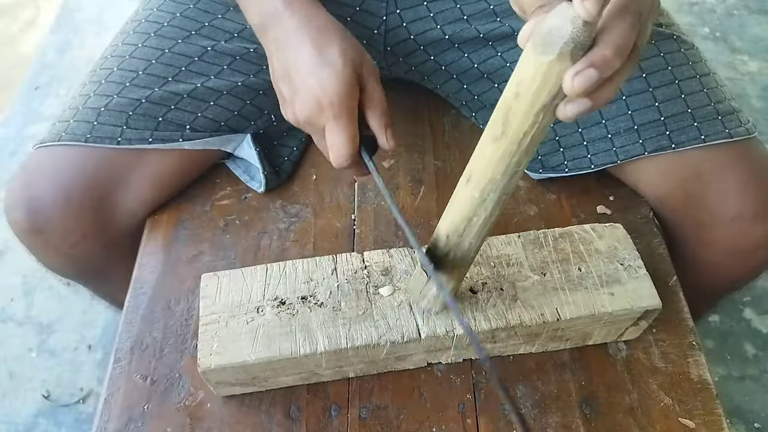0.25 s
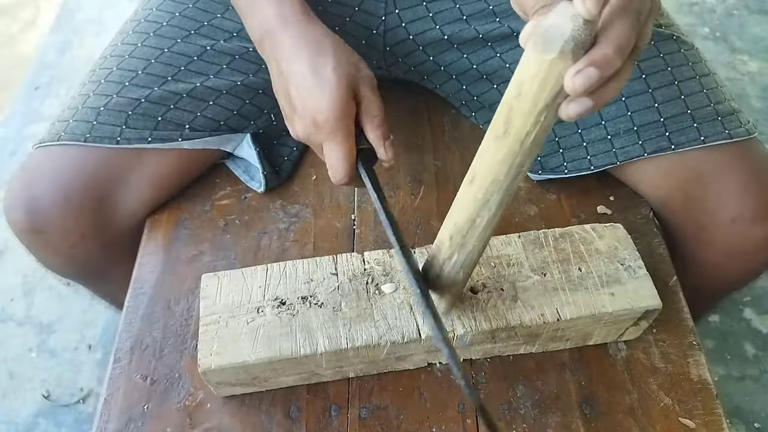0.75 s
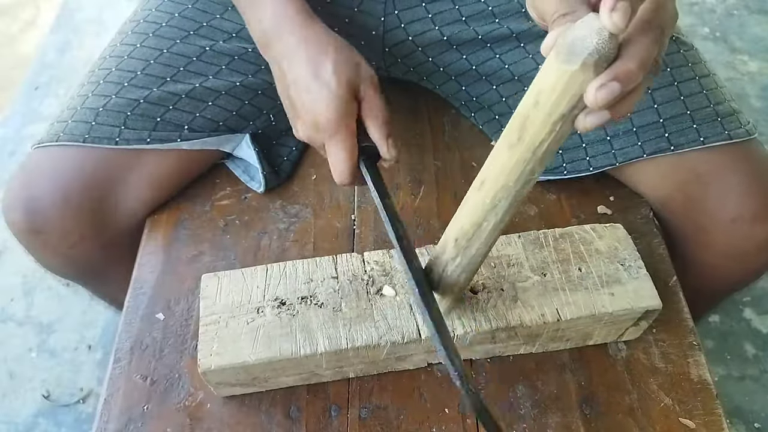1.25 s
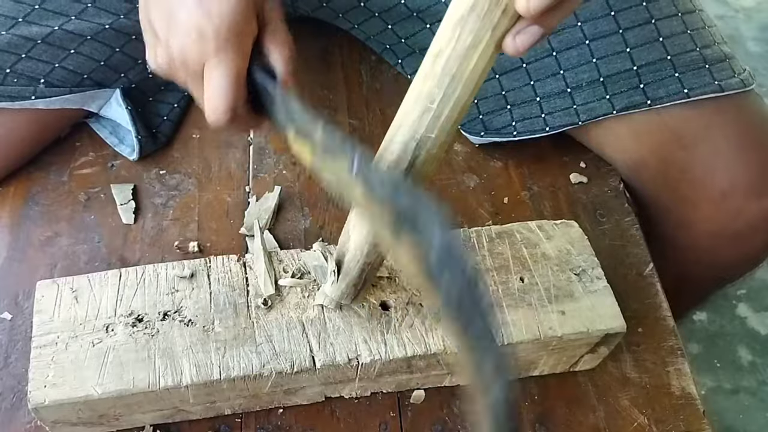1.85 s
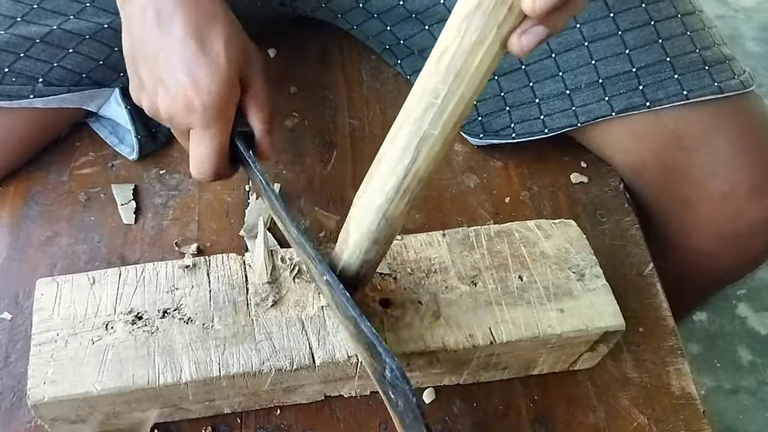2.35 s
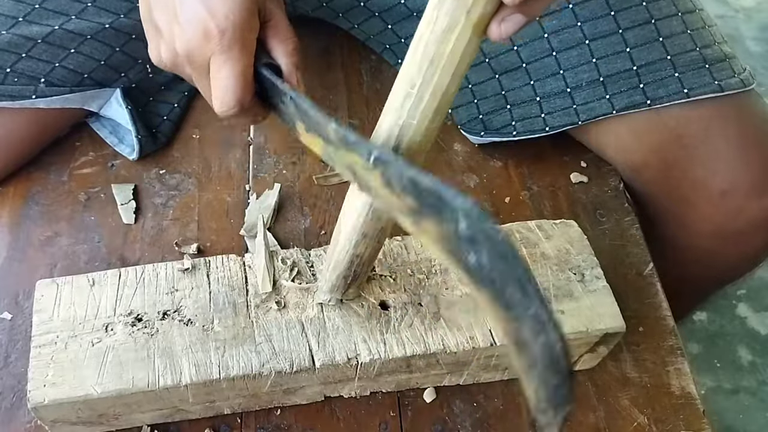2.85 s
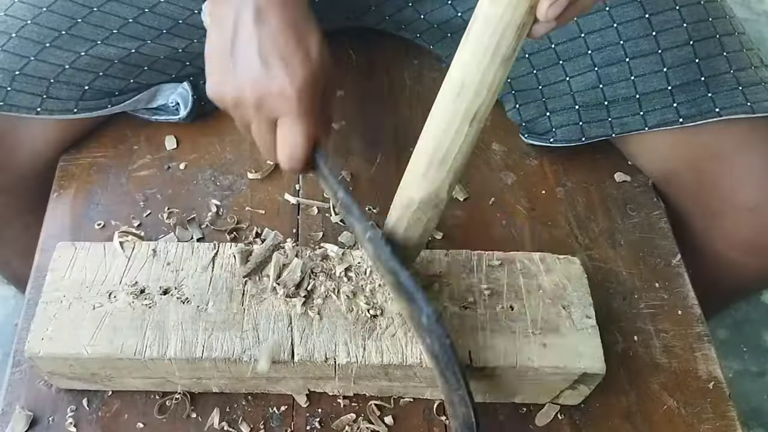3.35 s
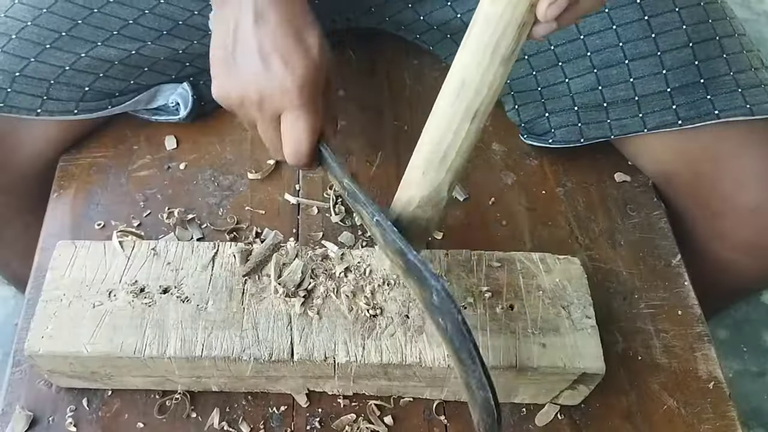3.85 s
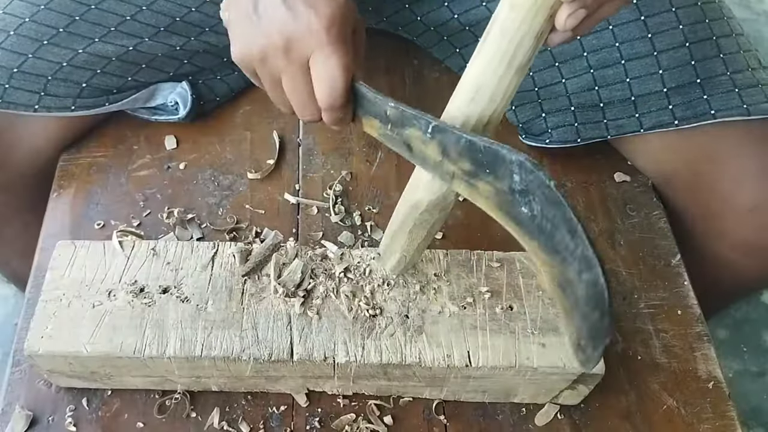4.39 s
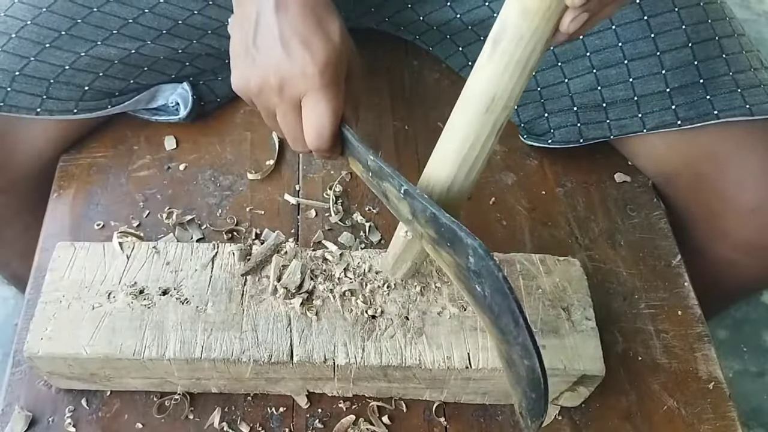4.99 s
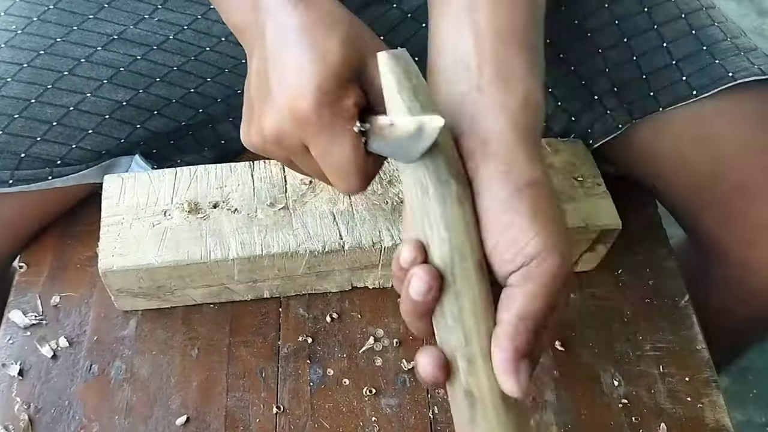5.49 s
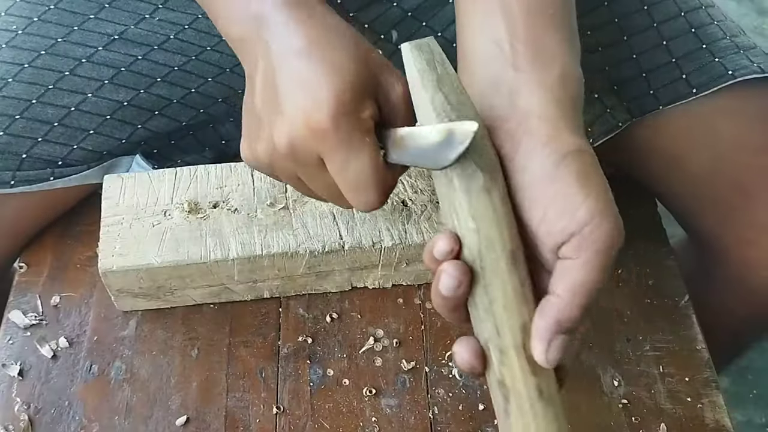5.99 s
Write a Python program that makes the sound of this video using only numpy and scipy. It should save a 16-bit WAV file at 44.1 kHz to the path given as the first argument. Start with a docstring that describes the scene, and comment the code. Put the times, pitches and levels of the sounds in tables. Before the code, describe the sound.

A curved blade chops a wooden stick on a block with hard, hollow knocks, then scratchy shaving strokes, while chicks peep faintly in the distance.

```python
"""Outdoors at a bench, a phone held close above: a curved blade works the end of a bamboo stick on a block.
From the start it chops: blows ring modes of bench and block, noise bursts crack through blade and stick.
Light strokes hiss between the blows; from about 3.4 s shaving takes over, gritty noise under edge pressure.
Far chicks peep throughout as blurred glides; the background, banded noise, changes abruptly at 3.1 and 5.5 s.
From 5.5 s a distant motor hums, noise in narrow resonances. A diffuse porch echo follows the work."""
import sys
import numpy as np
from scipy import signal
from scipy.fft import rfft, irfft, next_fast_len
from scipy.io import wavfile
from scipy.ndimage import uniform_filter1d

SR = 44100
rng = np.random.default_rng(int(sys.argv[2]) if len(sys.argv) > 2 else 0)


def put_to_file(sound):
    """Save the sound as 16-bit audio at rate SR, in the file named by the first command-line argument."""
    columns = np.atleast_2d(sound).T  # one column per channel
    safe = np.clip(columns, -1, 1)
    whole_steps = np.round(safe * 32767)
    wavfile.write(sys.argv[1], SR, whole_steps.astype(np.int16))


N = 274743
TIME = np.arange(N) / SR
FFT_SIZE = next_fast_len(N, True)
FREQ = np.fft.rfftfreq(FFT_SIZE, 1 / SR)


def undb(db):
    """Decibels to gain."""
    return np.exp(np.asarray(db) * np.log(10) / 20)


def level(x, db):
    """Scale to an rms level."""
    return x * undb(db) / np.sqrt(np.mean(x ** 2))


def add(out, start_s, x):
    """Mix x into out from a start time."""
    i = max(int(start_s * SR), 0)
    out[..., i:i + x.shape[-1]] += x[..., :N - i]


def resonate(x, peaks):
    """Sum of two-pole resonances (pitch_hz, width_hz, level_db) with alternating sign."""
    total = 0
    for k, (hz, width_hz, db) in enumerate(peaks):
        b, a = signal.iirpeak(hz, hz / width_hz, SR)
        total = total + (-1) ** k * undb(db) * signal.lfilter(b, a, x)
    return total


def smooth(x, k):
    """Two moving averages of k samples."""
    return uniform_filter1d(uniform_filter1d(x, k), k)


def walk(rate_hz):
    """Smooth random drift with spread near 1, one new value per period."""
    k = int(SR / rate_hz)
    steps = np.repeat(rng.standard_normal(N // k + 1), k)
    return np.sqrt(2) * smooth(steps, k)[:N]


def pair(likeness):
    """Left and right noise that are partly the same."""
    mid, side = rng.standard_normal((2, N))
    c = np.clip(likeness, 0, 1)
    return (np.sqrt(1 + c) * mid + np.sqrt(1 - c) * side * np.array([[1], [-1]])) / np.sqrt(2)


def octave_band(octave, centre_hz):
    """Gain of one octave band that overlaps its neighbours at constant power."""
    return np.clip(1 - np.abs(octave - np.log2(centre_hz)), 0, 1) ** .5


def colour(points):
    """Gain at every frequency from points (pitch_hz, level_db)."""
    hz, db = np.transpose(points)
    return undb(np.interp(np.log(np.maximum(FREQ, 1)), np.log(hz), db))


def shape(x, gain):
    """Filter by a gain at every frequency."""
    return irfft(rfft(x, FFT_SIZE) * gain, FFT_SIZE)[..., :N]


def push(contact_ms):
    """Half-sine force of unit area."""
    force = np.sin(np.pi * np.minimum(TIME[:SR // 100] * 1000 / max(contact_ms, .1), 1))
    return force / force.sum()


# modes of bench (below 400 Hz) and block (above), before detuning and damping:
# pitch_hz [Hz], level_db [dB], t60_s [s]
WOOD_MODES = [(200, -22, 0.31), (211, 6, 0.13), (240, 7.5, 0.13), (266.4, 4, 0.11), (290.4, 2.5, 0.11),
              (369.5, -0.5, 0.45), (437, -9.5, 0.12), (541, -13.5, 0.13), (601.4, -9.5, 0.082),
              (790, -31.5, 0.015), (738, -18, 0.034), (861, -18, 0.023), (1017, -9, .035),
              (1090, -25.5, 0.034), (1520, -18.5, 0.0075), (1700, -15.5, 0.026)]
FAVOUR_DB = 143  # loss of a bench mode one octave from the favoured pitch


def ring(favoured_hz, hard_db, damping, detune):
    """Answer to one unit tap: the slow bench modes and the quick block modes, as decaying sines."""
    hz, db, t60_s = np.transpose(WOOD_MODES)
    bench = hz < 400
    db = np.where(bench, db - FAVOUR_DB * np.log2(hz / favoured_hz) ** 2, db + hard_db)
    t = TIME[:SR // 3, None]
    decay = undb(db - 60 * t * damping / t60_s)
    modes = decay * np.sin(2 * np.pi * hz * (1 + 0.023 * detune) * t)
    return modes[:, bench].sum(axis=1), modes[:, ~bench].sum(axis=1)


# force of each blow on the block, before the bass cut: start_s [s], peak_db [dB],
# pitch_hz the bench favours [Hz], contact_ms [ms], hard_db level added to the block modes [dB],
# damping [factor on the decay rate]
BLOWS = [(0.066, 6.5, 280, 0.9, -11, 0.92), (.31, -36.5, 235, 2.9, -1, 0.85),
         (0.5967, 4.5, 272, 0.62, -9.5, 1.16), (0.6031, -2, 212, 0.81, 2.5, 0.86),
         (0.733, -14.5, 285, 1.5, -11, 1.24), (1.1308, 5.5, 276, 1.96, -30, 1.03),
         (1.213, -23, 220, 1.16, -16, 1.3), (1.368, -40, 245, 2.1, -7, 1.3),
         (1.5516, -4.5, 244, 3.1, -4.5, 0.84), (1.5613, 3.5, 263, 2.03, -1.5, 2.15),
         (1.742, -33, 234, 2.5, -10, .8), (1.955, -3, 254, 0.62, -7, 2), (1.9607, 2.5, 282, 1.06, 3, 1.5),
         (2.137, -42, 181, 1, -2, 0.86), (2.3704, 0.5, 240, 1.1, -18, 6.8),
         (2.379, 2.5, 252, 1.15, 9, 1.33), (2.806, -26.5, 240, 2.7, -12.5, 0.69),
         (2.85, -36.5, 246, 1.7, -18, 0.92), (3.0876, -3, 221, 1.44, -0.5, 0.92),
         (3.097, -9, 298.4, 0.32, 4.5, 1), (3.268, -26, 258, 2.6, -24, 0.88),
         (3.4003, 1.5, 227, 1.26, 0, 1.27), (3.4228, -12, 212, 1.5, -2, 2.1),
         (3.467, -3, 218, 0.9, -18, 1.01), (3.569, -10.5, 240, 1.14, -16, 0.56),
         (3.809, -24.5, 240, 1.2, -19, 0.63), (3.841, -12, 240, 1.36, -18, 0.55),
         (3.865, -10.5, 232, 2.1, -12, 0.76), (4.133, -32, 238, 2.8, -19, 0.44),
         (4.5724, -10, 225, 1.1, -12, 0.48), (4.5867, 4, 215, 1.76, -8.5, 1.6),
         (4.774, -28.5, 240, 1.1, 1.5, 0.89), (4.973, -18.5, 234, 2.7, -9.5, 1.6),
         (5.006, -23.5, 222, 3.3, 0.5, 0.59), (5.345, -7, 230, 2.1, -2, 0.84)]


def blows():
    """Chopping blows: the bench feels the whole push, the block only its sharp start."""
    out = np.zeros(N)
    detune = rng.standard_normal((len(BLOWS), len(WOOD_MODES)))
    for (start_s, db, hz, contact_ms, hard_db, damping), d in zip(BLOWS, detune):
        bench, block = ring(hz, hard_db, damping, d)
        bench_thud = signal.fftconvolve(bench, push(contact_ms))
        block_thud = signal.fftconvolve(block, push(0.26 * contact_ms))
        thud = bench_thud - block_thud
        add(out, start_s, thud * undb(db) / np.max(np.abs(thud)))
    return out


# the blade reaches the block, before the bass cut: start_s [s], peak_db [dB],
# pitch_hz the block favours [Hz], t60_ms [ms]
KNOCKS = [(1.9608, -4.5, 800, 17), (2.3784, 7.5, 1447, 21), (4.5861, 3.5, 730, 15)]


def knocks():
    """Short hard knocks: block modes near the favoured pitch, damped by the blade that stays on the wood."""
    out, t = np.zeros(N), TIME[:SR // 8, None]
    hz = np.array([mode[0] for mode in WOOD_MODES if mode[0] > 400])
    for start_s, db, favoured_hz, t60_ms in KNOCKS:
        decay = undb(-70 * np.log2(hz / favoured_hz) ** 2 - 60000 * t / t60_ms)
        modes = decay * np.sin(2 * np.pi * hz * t)
        knock = -signal.fftconvolve(modes.sum(axis=1), push(0.84))
        add(out, start_s, knock * undb(db) / np.max(np.abs(knock)))
    return out


# resonances of blade and stick: pitch_hz [Hz], width_hz [Hz], level_db [dB]
BLADE_PEAKS = [(1806, 210, -17), (2830, 380, 0.2), (3300, 290, -2.5), (3900, 230, -3.5), (5074, 320, -4.2),
               (5770, 260, -38.5), (7500, 310, -36.5), (9670, 2430, -2.5)]
# fibres snapping and chips landing: start_s [s], level_db relative, set over the first 3 ms [dB],
# pan_db left minus right in the treble [dB], t60_ms of the main burst [ms],
# tilt_db brightness, held at -7 or above [dB per octave]
CRACKS = [(0.062, -10.5, 4, 32, -7), (0.31, -40.5, 21, 80, 0), (0.5936, -7, 7, 13, -7),
          (0.6004, -8, 2, 5.5, -5.5), (0.7304, -14.5, 7, 22, -3.5), (0.74, -17, -9, 20, 1.5),
          (1.1278, -10.5, 3, 35, -6.5), (1.202, -32, 7, 38, 6), (1.3686, -48.5, 3, 31, 4),
          (1.3898, -18, 10, 8.3, 14), (1.5506, -21, -6, 59, -2.5), (1.7427, -64, 15, 21, 0),
          (1.9526, -13.5, 2, 51, -16.5), (1.959, -22.5, 10, 22, 9.5), (2.367, -21.5, 0, 42, -6.5),
          (2.37, -11, 1, 26, -2.5), (2.3764, -13, -1, 13, -12.3), (2.4992, -34, 9, 9.6, 1),
          (2.5138, -41.5, 3, 69, -6), (2.617, -39.5, 6, 11, -12.5), (2.65, -51, 11.5, 75, -9),
          (3.084, -24.5, 5.5, 97, -2.2), (3.3776, -36, 6, 120, 4), (3.3962, -16, -0.5, 38, -1),
          (3.4647, -29, -2, 21, -8.5), (3.624, -36.5, 16, 54, -9), (3.9614, -46, -3, 25, 34),
          (4.07, -36, 13, 27, 12), (4.4366, -43.5, 11, 40, -3), (4.5667, -25.5, 9, 51, -2.5),
          (4.585, -31, -3, 26, -23), (4.6847, -45.5, 4, 27, -2), (4.972, -38.5, 8, 69, 0.5),
          (5.343, -29, 6, 51, -4), (5.626, -28, 3.5, 45, 0.5)]
SHADE_HZ = 4000  # the phone body shades one port above this


def cracks():
    """Bursts of snapping fibres that ring blade and stick, with a weaker splintering tail."""
    out, size = np.zeros((2, N)), SR // 5
    noise = rng.standard_normal((len(CRACKS), 2, size))
    t, f = TIME[:size], np.fft.rfftfreq(size, 1 / SR)
    shade = f ** 2 / (f ** 2 + SHADE_HZ ** 2) * np.array([[1], [-1]])  # left, right
    octaves = np.log2(np.maximum(f, 800) / 5000)
    for (start_s, db, pan_db, t60_ms, tilt_db), (same, unlike) in zip(CRACKS, noise):
        # even the dullest snap keeps some treble
        colour_db = max(tilt_db, -7) * octaves + shade * pan_db / 2
        spectrum = rfft(same) + 1.18 * shade * rfft(unlike)
        snap = irfft(spectrum * undb(colour_db), size)
        splintering = undb(-33.5 - 60 * t / 0.13)
        snap *= np.minimum(t / 0.0015, 1) * (undb(-60000 * t / t60_ms) + splintering)
        burst = resonate(snap, BLADE_PEAKS) + 0.21 * snap
        onset_rms = np.sqrt(np.mean(burst[:, :SR // 300] ** 2))
        add(out, start_s, burst * undb(db - 4.5) / onset_rms)
    return out


STEP = 32  # samples between pressure values
BITE_DB_PER_S, LIFT_DB_PER_S = 440.5, 518


def stroke(start_s, hold_s):
    """Pressure of one stroke as a gain: the edge bites in, holds and lifts off."""
    t = TIME[::STEP]
    bite_db = BITE_DB_PER_S * (t - start_s)
    lift_db = LIFT_DB_PER_S * (start_s + hold_s - t)
    return undb(np.minimum(0, np.minimum(bite_db, lift_db)))


RATTLE_DB, RATTLE_T60_S = -23, 0.23  # the block shakes on; dB relative to the blow
SPLINTER_DB, SPLINTER_T60_S = -56, 0.28  # hiss, likewise


def aftershake():
    """What goes on after every blow: splintering hiss and block rattle, as decaying gains."""
    out, t = np.zeros((2, N)), TIME[:SR // 3]
    for start_s, db, *_ in BLOWS:
        splinter_db = db + SPLINTER_DB - 60 * t / SPLINTER_T60_S
        rattle_db = db + RATTLE_DB - 60 * t / RATTLE_T60_S
        add(out, start_s, undb([splinter_db, rattle_db]))
    return out


# strokes of the edge along the fibres, down and back: start_s of full bite [s], hold_s [s],
# hiss_db gain on the tearing noise [dB], rumble_db gain on the slips that shake the bench [dB]
SHAVES = [(0.758, 0.0059, -38, -39), (0.829, 0.02, -54, -63), (1.19, 0.077, -59.5, -59),
          (1.4, 0.018, -61.5, -69), (1.742, 0.016, -55.5, -48), (2.151, 0.0088, -60, -69),
          (2.258, 0.011, -67, -61.5), (2.501, 0.056, -56, -39), (3.274, 0.028, -58.5, -60.5),
          (3.389, .02, -50, -51), (3.412, 0.04, -43.5, -22), (3.568, 0.016, -65, -33),
          (3.658, 0.082, -55.5, -64), (3.835, 0.052, -41, -30.5), (4.014, 0.074, -52.5, -45.5),
          (4.198, 0.04, -39, -22.5), (4.369, 0.034, -51, -44), (4.435, 0.012, -54.5, -50),
          (4.534, 0.039, -42.5, -22.5), (4.78, 0.038, -48, -51), (4.993, 0.037, -44.5, -45),
          (5.187, 0.036, -48, -55.5), (5.312, 0.049, -50.5, -45), (5.351, 0.027, -42.5, -29.5),
          (5.598, 0.028, -45.5, -61)]
# between strokes the edge rests on the stick: (start, end) in s, gains in dB
DRAG_S, DRAG_HISS_DB, DRAG_RUMBLE_DB = (3.4, 5.5), -62.5, -53


def pressure():
    """Gains of hiss and rumble, summed from strokes, drag and blows."""
    gains = stroke(DRAG_S[0], DRAG_S[1] - DRAG_S[0]) * undb([[DRAG_HISS_DB], [DRAG_RUMBLE_DB]])
    for start_s, hold_s, hiss_db, rumble_db in SHAVES:
        gains += stroke(start_s, hold_s) * undb([[hiss_db], [rumble_db]])
    return np.repeat(gains, STEP, axis=1)[:, :N] + aftershake()


def gritty(spread_db):
    """Dense clicks of very unequal size, at unit rms."""
    return level(rng.standard_normal(N) * undb(spread_db * rng.exponential(size=N)), 0)


# colour of tearing fibres: pitch_hz [Hz], level_db [dB per Hz, relative]
TEAR_COLOUR = [(530, -40), (900, -9), (1080, -7.5), (1270, -9.5), (1690, -4.5), (1960, -6.5), (2260, -1),
               (2930, -5), (3190, -3.5), (4100, -9), (5390, -9), (7010, -10.5), (9560, 0.5), (14500, -8),
               (15600, -8.5)]
GRIT_DB, SLIP_DB = 3.5, 2.8  # how unequal the clicks are
CATCH_DB, CATCH_PER_S = 3.5, 160  # the edge catches and lets go


def shaves():
    """Tearing fibres hiss while the slipping edge shakes the bench."""
    hiss_gain, rumble_gain = pressure()
    grit = gritty(GRIT_DB) * undb(CATCH_DB * walk(CATCH_PER_S))
    tear = grit * undb([[1.5], [-1.5]]) + 1.18 * pair(0)
    tear = tear + undb(6.5) * resonate(tear, BLADE_PEAKS)
    hiss = level(shape(tear, colour(TEAR_COLOUR)), 0.68) * hiss_gain
    # lower and upper hiss swell independently at random, so the colour keeps changing
    lower = signal.sosfilt(signal.butter(2, 6500, fs=SR, output="sos"), hiss)
    upper = hiss - lower
    hiss = lower * undb(4.1 * walk(25)) + upper * undb(2.0 * walk(25.05))
    slips = gritty(SLIP_DB) * rumble_gain
    tap = sum(ring(220.0, -28.5, 1.74, np.zeros(len(WOOD_MODES))))
    rumble = signal.fftconvolve(slips, tap / np.sqrt(np.sum(tap ** 2)))[:N]
    return hiss, rumble


# porch echo in octave bands: pitch_hz [Hz], t60_s [s], level_db relative [dB]
PORCH_BANDS = [(151, 0.22, -18.5), (334, 0.72, -31), (565, 0.23, -11), (1132, 0.15, -9.5),
               (2390, 0.11, -14.5), (4800, 0.063, -18), (9810, 0.07, -14.5)]


def porch(x):
    """Diffuse echo: noise that dies at its own rate in each octave."""
    size = SR * 2 // 3
    t, octave = TIME[:size], np.log2(np.maximum(np.fft.rfftfreq(size, 1 / SR), 1))
    tail = 0
    for hz, t60_s, db in PORCH_BANDS:
        noise = rng.standard_normal((2, size))
        noise[1] += (noise[0] - noise[1]) * min(100 / hz, .6)  # low bands are more alike left and right
        band = irfft(rfft(noise) * octave_band(octave, hz), size)
        envelope = np.minimum(t / 0.0007, 1) * undb(-60 * t / t60_s)
        tail = tail + band * envelope * undb(db + 3.5) / np.sqrt(np.sum(envelope ** 2))
    return signal.fftconvolve(x[None], tail, axes=1)[:, :N]


def sweep(start_s, end_s, hz0, hz1):
    """Progress from 0 to 1 and the phase of a straight pitch glide."""
    size = int((end_s - start_s) * SR)
    u = np.arange(size) / size
    return u, 2 * np.pi * np.cumsum(hz0 + (hz1 - hz0) * u) / SR


def glide(start_s, end_s, hz0, hz1, smear_hz):
    """A gliding partial, blurred by distance into a narrow band."""
    u, phase = sweep(start_s, end_s, hz0, hz1)
    k = int(SR / smear_hz)
    noise = rng.standard_normal((2, 2, len(u)))
    a, b = smooth(noise, k) * np.sqrt(3 * k / 2)
    return np.sin(np.pi * u) ** .5 * (a * np.cos(phase) + b * np.sin(phase))


# far chicks, before the flutter: start_s [s], end_s [s], start pitch_hz [Hz], end pitch_hz [Hz],
# level_db before the swell [dB rms], octave_db level of the octave partial relative to it [dB]
PEEPS = [(0.0, 0.062, 3900, 3240, -57, -16), (0.099, 0.246, 3200, 1700, -56, -12),
         (0.255, 0.375, 2870, 1636, -58.5, -6.5), (0.359, 0.562, 4210, 3720, -61.5, -8),
         (0.53, 0.598, 3840, 2960, -54, -19), (1.012, 1.147, 3500, 3390, -61, -2.5),
         (1.61, 1.741, 4570, 4800, -56, -23), (1.624, 1.764, 2600, 2600, -63.5, -20),
         (1.993, 2.194, 3900, 2550, -58, -20.5), (2.849, 2.93, 3300, 2776, -62, -21),
         (2.77, 2.861, 2990, 3200, -67.5, -21), (2.938, 3.078, 3110, 1830, -57, -16),
         (3.127, 3.18, 4460, 4280, -58.5, -5), (3.485, 3.578, 4340, 4120, -53, -26),
         (4.263, 4.385, 3580, 3100, -55.5, -33), (4.871, 4.953, 4740, 3800, -54, -18),
         (5.075, 5.209, 3760, 3400, -58, -21), (5.398, 5.526, 3450, 3500, -51.5, -18),
         (5.644, 5.737, 4440, 4420, -58.5, -10), (5.726, 5.871, 2880, 1440, -57.5, -25),
         (5.901, 6.113, 4000, 2930, -57.5, -27), (5.987, 6.219, 2610, 1700, -58, -23)]
PEEP_SMEAR_HZ = 700


def peeps(out):
    """Nearer chicks: a gliding partial and its octave."""
    for t0, t1, hz0, hz1, db, octave_db in PEEPS:
        add(out, t0, undb(db) * glide(t0, t1, hz0, hz1, PEEP_SMEAR_HZ))
        octave = glide(t0, t1, 2 * hz0, 2 * hz1, 2 * PEEP_SMEAR_HZ)
        add(out, t0, undb(db + octave_db) * octave)


CHORUS_SPAN_S, CHORUS_COUNT = (2.95, 5.6), 150
CHORUS_DB, CHORUS_HZ = -66.5, 3220  # quietest peep, middle pitch


def chorus(out):
    """Farther chicks: many short glides at random times and pitches."""
    for when, pitch, length, fall, loud in rng.random((CHORUS_COUNT, 5)):
        t0 = np.interp(when, (0, 1), CHORUS_SPAN_S)
        t1 = t0 + 0.042 + .12 * length
        hz = CHORUS_HZ * 2 ** (1.1 * (pitch - .5))
        peep = glide(t0, t1, hz, hz * (1.03 - 0.097 * fall), PEEP_SMEAR_HZ / 2)
        add(out, t0, undb(CHORUS_DB + 7.3 * loud) * peep)


# faint tones, low and middle, perhaps birds or a hen: start_s [s], end_s [s],
# start pitch_hz [Hz], end pitch_hz [Hz], level_db before the swell [dB]
FAINT_TONES = [(.92, 1.0, 450, 440, -61), (.9, .98, 690, 640, -68), (1.03, 1.12, 405, 400, -57),
               (1.43, 1.52, 320, 320, -61), (1.33, 1.52, 1340, 1360, -76), (2.62, 2.74, 1150, 1170, -68.5)]


def faint_tones(out):
    """Faint tones, low and middle: plain gliding sines that swell and fade."""
    for t0, t1, hz0, hz1, db in FAINT_TONES:
        u, phase = sweep(t0, t1, hz0, hz1)
        add(out, t0, undb(db) * np.sqrt(2 * np.sin(np.pi * u)) * np.sin(phase))


def birds():
    """Peeps and chorus, broken up by a quick flutter, and faint tones without it."""
    out = np.zeros((2, N))
    peeps(out)
    chorus(out)
    out *= undb(3 * walk(45))
    faint_tones(out)
    return out


# resonances of the hum: pitch_hz [Hz], width_hz [Hz], level_db relative [dB]
MOTOR_PEAKS = [(130, 30, -26), (182, 19, -14), (277.2, 8.1, 2.5), (432, 100, -18.5), (576.3, 5.6, 1.5),
               (845, 94, -19.5), (1126, 45, -9), (1325, 84, -13)]
MOTOR_S, MOTOR_DB = 5.5, -46  # start in s, rms level in dB before the fade-in


def motor():
    """Wavering distant hum: noise in narrow resonances."""
    muffled = resonate(pair(0.62), [(487, 730, 0)])
    fade_in = np.clip((TIME - MOTOR_S) / 0.026, 0, 1)
    return level(resonate(muffled, MOTOR_PEAKS), MOTOR_DB) * fade_in


# background in three stretches that change abruptly in level and colour: start_s [s],
# colour points (pitch_hz [Hz], level_db [dB per Hz, relative]), level_db before the short crossfade [dB rms]
BACKGROUND = [(0.0, [(30, -19.5), (70, -10.5), (120, -10), (200, 5), (350, -13), (550, -16.5), (1000, -23),
              (1800, -22), (3200, -22.5), (4600, -23.5), (5300, -31.5), (8500, -31), (10000, -22.5),
              (11500, -31), (15600, -29)], -54), (3.101, [(30, -37), (75, -23.5), (230, -24.5), (520, -13),
              (1200, -15), (3000, -16), (4600, -26), (6000, -19), (8000, -44), (10000, -22), (12000, -31),
              (15600, -62)], -59), (5.502, [(30, -22), (80, -1.5), (250, -10), (600, -11.5), (1300, -31),
              (1600, -19.5), (3200, -17.5), (4800, -27.5), (7000, -33), (10000, -25), (12000, -33),
              (15600, -31)], -52)]


def background():
    """Outdoor noise in octave bands that flicker alone; the bass is alike left and right."""
    octave, flat = np.log2(np.maximum(FREQ, 1)), 0
    for hz in 45 * 2. ** np.arange(9):
        band = shape(pair(1 - hz / 5000), octave_band(octave, hz))
        flat = flat + band * undb(0.49 * walk(3.3))
    out = np.zeros((2, N))
    ends = [stretch[0] for stretch in BACKGROUND[1:]] + [2 * N / SR]
    for (start_s, points, db), end_s in zip(BACKGROUND, ends):
        inside_s = np.minimum(TIME - start_s, end_s - TIME)
        at_once = (start_s == 0) * (TIME < 1)  # the first stretch has no fade-in
        fade = np.clip(inside_s / 0.028 + .5 + at_once, 0, 1)
        out += fade * level(shape(flat, colour(points)), db)
    return out


def scene():
    """Work close by, its echo, and the surroundings."""
    hiss, rumble = shaves()
    # a small bench radiates no deep bass
    bass_cut = signal.butter(4, 140, "high", fs=SR, output="sos")
    thuds = signal.sosfilt(bass_cut, blows() + knocks() + rumble)
    work = thuds + cracks() + hiss
    return work + porch(work.mean(axis=0)) + birds() + motor() + background()


def record(dry):
    """The phone microphone loses deep bass, rounds the peaks and cuts the top."""
    x = signal.sosfilt(signal.butter(2, 85, "high", fs=SR, output="sos"), dry)
    rounded = np.tanh(0.69 * x) / 1.04
    return signal.sosfilt(signal.ellip(10, .2, 70, 16000, fs=SR, output="sos"), rounded)


dry = scene()
out = record(dry)
put_to_file(out)
```